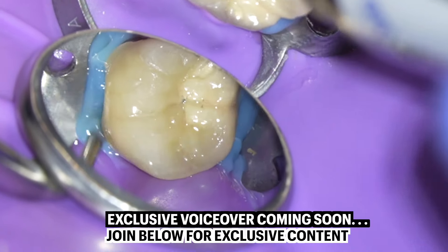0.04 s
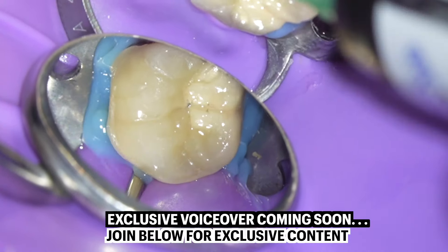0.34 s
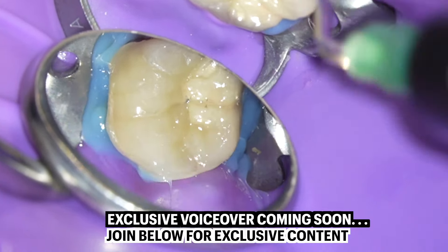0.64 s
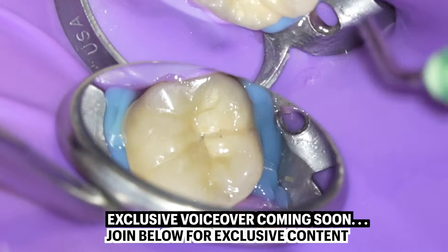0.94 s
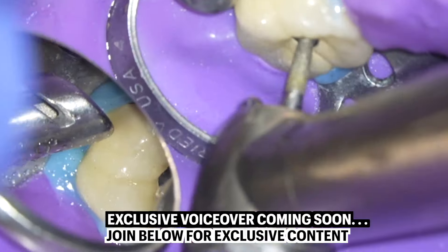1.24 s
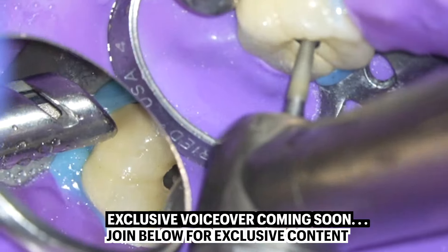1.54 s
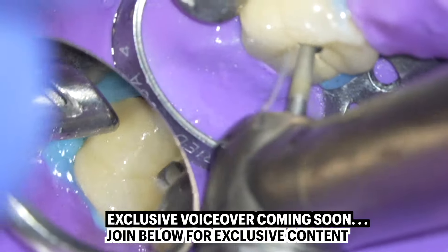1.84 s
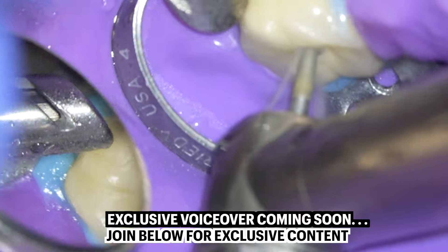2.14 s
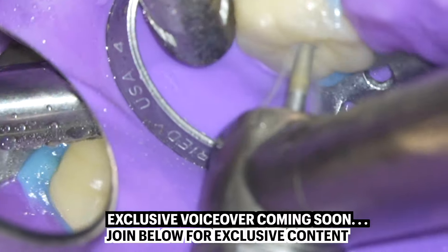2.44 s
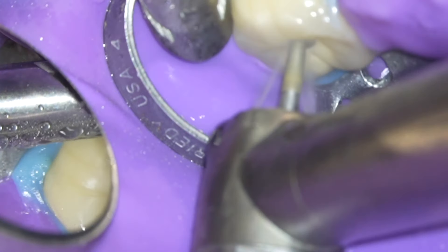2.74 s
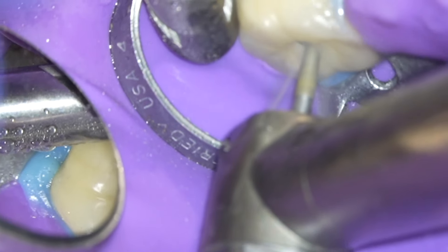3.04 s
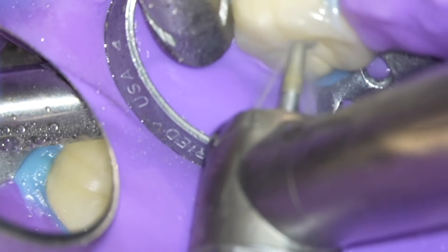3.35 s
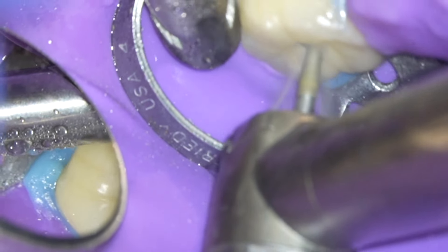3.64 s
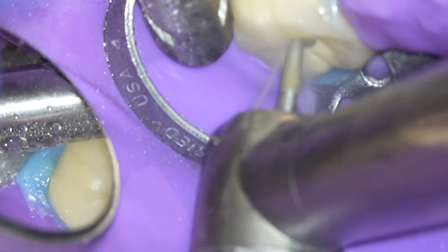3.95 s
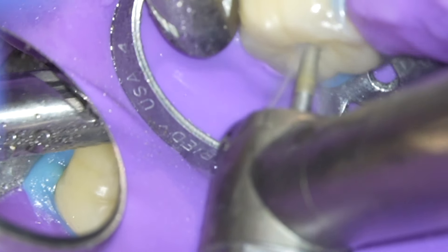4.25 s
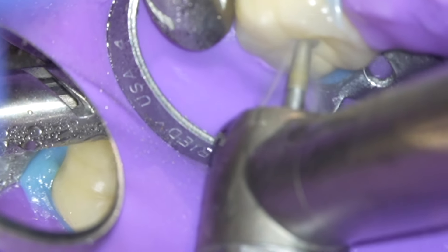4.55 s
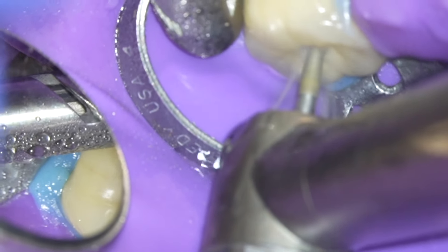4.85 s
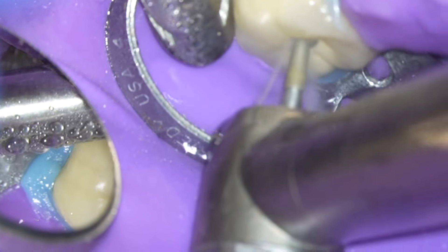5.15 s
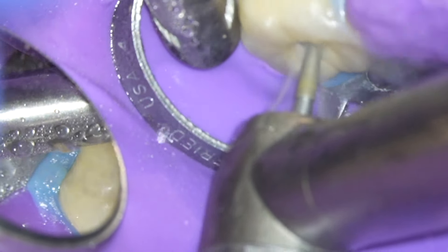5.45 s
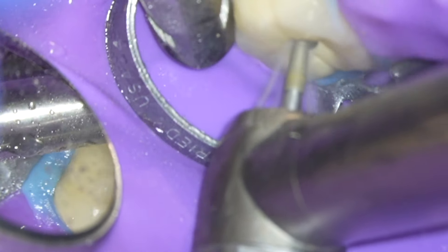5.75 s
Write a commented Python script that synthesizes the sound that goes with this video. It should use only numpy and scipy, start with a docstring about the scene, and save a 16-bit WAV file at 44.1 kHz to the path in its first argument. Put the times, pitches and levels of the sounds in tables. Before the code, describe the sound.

Close to the microphone, a suction tube and a fine water spray suddenly begin hissing over the low hum of a clinic room. A dental drill glides up to a thin, high whine, then dips and recovers repeatedly as it works on a tooth, dropping furthest near the end. Small gurgles pass through the suction while the spray keeps fizzing and grows slightly wetter.

```python
"""Dental clinic room: ventilation and machines hum; then a suction tip and a water spray start at once,
hissing close to the microphone. The air turbine of a handpiece spins up and whines, sagging whenever
the bur presses on the tooth. Hard surfaces nearby colour the spray and make the gliding whine flutter.
Gentle gain control ducks the hiss under a loud whine."""
import sys
import numpy as np
from scipy import signal
from scipy.fft import rfft, irfft
from scipy.io import wavfile

SR = 44100
rng = np.random.default_rng(int(sys.argv[2]) if len(sys.argv) > 2 else 0)


def transcribe(signal):
    """Save signal, clipped to [-1, 1], as a 16-bit WAV file at the path in sys.argv[1]."""
    frames = np.atleast_2d(signal).T
    limited = np.clip(frames, -1, 1)
    pcm = np.round(limited * 32767).astype(np.int16)
    wavfile.write(sys.argv[1], SR, pcm)


N = 256220
TIME, FREQ = np.arange(N) / SR, np.fft.rfftfreq(N, 1 / SR)


def gain_of(db):
    """Decibels to amplitude."""
    return 10 ** (np.asarray(db) / 20)


def unit_rms(x):
    """Scale to rms 1."""
    return x / np.sqrt(np.mean(x ** 2) + 1e-20)


def spectrum(points, hz=FREQ):
    """Interpolate points on a log-frequency axis."""
    point_hz, value = np.transpose(points)
    return np.interp(np.log(hz + 1), np.log(point_hz + 1), value)


def follow(rows):
    """Interpolate each column of a time table at every sample."""
    time_s, *columns = np.transpose(rows)
    return [np.interp(TIME, time_s, column) for column in columns]


def wander(cutoff_hz):
    """Low-passed noise, rms 1."""
    return unit_rms(irfft(rfft(rng.standard_normal(N)) / (1 + (FREQ / cutoff_hz) ** 4), N))


def bell(hz, width_hz):
    """Resonance curve, peak 1."""
    return 1 / (1 + (2 * (FREQ - hz) / width_hz) ** 2)


def bump(centre_s, half_s):
    """Gaussian pulse, peak 1."""
    return np.exp(-((TIME - centre_s) / half_s) ** 2)


def ease(u):
    """Cosine step from 0 to 1."""
    return .5 - .5 * np.cos(np.pi * np.clip(u, 0, 1))


def turbulence():
    """Two independent white noises."""
    return rng.standard_normal((2, N))


def at_ports(drive, colour, band_hz=(0, SR)):
    """Two independent noises blend into one source at two microphone ports; mid rms 1 within band_hz."""
    # likeness of the ports (frequency [Hz], coherence [0-1])
    likeness = [(100, 1), (400, 0.85), (800, 0.63), (3200, 0.94), (4000, 0.33), (5000, 0.63), (6500, 1),
                (7800, 0.38), (9500, 0.79), (11000, 0.23), (12800, 1), (15500, 0.88)]
    # port balance (frequency [Hz], left minus right [dB])
    balance = [(100, 2.5), (450, -2.5), (1000, 0), (2200, -2.5), (3200, 3.5), (4200, -1), (5800, -3),
               (7700, 2.5), (10300, 2), (11500, 0), (12500, -3), (15500, 3)]
    # port phase (frequency [Hz], left lead [rad])
    lead = [(200, 0.2), (2000, 0.49), (3000, 1.02), (3900, -0.7), (5000, -0.57), (6500, 1.27), (7500, 0.73),
            (9000, 0.69), (10200, -0.35), (10900, -0.4), (12000, -0.21), (15000, -0.1)]
    left, other = rfft(drive)
    apart = FREQ ** 2 / (FREQ ** 2 + 200 ** 2)  # long waves reach both ports alike
    coherence = np.clip(1 - apart * (1 - spectrum(likeness)), 0, 1)
    right = (coherence * left + np.sqrt(1 - coherence ** 2) * other) * np.exp(-1j * apart * spectrum(lead))
    lean = gain_of(apart * spectrum(balance) / 2)
    ports = np.array([left * lean, right / lean]) * colour
    in_band = (FREQ > band_hz[0]) & (FREQ < band_hz[1])
    return irfft(ports, N) / np.std(irfft(ports.mean(0) * in_band, N))


def reflections(x, t60_s):
    """Sparse echoes off nearby hard surfaces, different at each port."""
    delay_s = TIME[:SR // 3]
    shape = (2, len(delay_s))
    taps = rng.choice([-1., 1.], shape) * (rng.random(shape) < 2000 / SR) * (delay_s > .002)
    taps *= gain_of(-60 * delay_s / t60_s)
    taps /= np.linalg.norm(taps, axis=1, keepdims=True)
    return signal.fftconvolve(x, taps, axes=1)[:, :N]


def room(waver_hz=1):
    """Ventilation rumble, wavering machine hum and thin whistles of escaping air."""
    # ventilation noise (frequency [Hz], density [dB])
    vent_colour = [(8, -14), (22, -2.5), (30, -6.5), (42, -12), (56, -6.5), (85, -18), (130, -19),
                   (170, -15.5), (250, -19), (420, -17), (600, -21.5), (1100, -22), (1700, -24.5),
                   (2100, -28), (3300, -32.5), (5000, -40.5), (8300, -40.5), (9200, -47.5), (11800, -47),
                   (14000, -68)]
    # ventilation, sinking once the drill runs (time [s], level [dB])
    vent_level = [(0, -71), (1.93, -69.5), (2.05, -72), (2.4, -72.5), (2.6, -76.5), (4.4, -76),
                  (4.85, -73.5), (5.8, -76.5)]
    # machine tones (frequency [Hz], opening level [dB])
    hum_tones = [(24, -70.5), (117.5, -73.5), (419, -83.5), (705, -85.5), (1012, -89.5), (1120, -90)]
    # air leaks (frequency [Hz], width [Hz], level [dB])
    leaks = [(5560, 88, -94), (6460, 150, -91.5), (8680, 130, -93.5)]
    vent_db, = follow(vent_level)
    vent = gain_of(vent_db) * at_ports(turbulence(), gain_of(spectrum(vent_colour)), band_hz=(20, 350))
    hum = whistles = 0
    for hz, db in hum_tones:
        amplitude = np.sqrt(2) * gain_of(db + .5 * wander(9.1))
        hum += amplitude * np.sin(2 * np.pi * np.cumsum(hz + waver_hz * wander(8.2)) / SR)
    hum *= gain_of(vent_db - vent_db[:SR].mean())  # sinks with the rumble
    for hz, width_hz, db in leaks:
        whistles += gain_of(db + wander(4.3)) * at_ports(turbulence(), bell(hz, width_hz))
    return vent + hum + whistles


def tube_db():
    """Colour the suction tube gives to whatever rushes into it."""
    # pipe resonances and notches (frequency [Hz], width [Hz], lift [dB])
    modes = [(728, 81, 6), (1096, 46, -20), (1433, 110, 2.5), (1494, 38, -7.5), (1598, 42, -8),
             (1730, 120, 2.5), (1756, 29, -12), (1970, 39, 4.5), (2052, 31, 10), (2630, 45, 5.5),
             (2770, 70, 1.5), (2810, 34, 5), (2930, 39, -11), (2980, 68, 12), (3555, 110, 5),
             (3780, 70, 5.5), (3800, 220, -2.5), (4250, 100, 10)]
    return sum(db * bell(hz, width_hz) for hz, width_hz, db in modes)


def suction(rush_trim_db=.03, ring_trim_db=-1.5, gurgle_db=.5):
    """Air rushes through the faintly hooting tube; water passing the hollow tip makes it gulp."""
    # steady draw (time [s], air rush [dB], tip ring [dB])
    draw = [(1.2, -59.5, -59.5), (1.9, -58.5, -57.5), (2.5, -61, -61.5), (3.8, -60.5, -60), (4.7, -60, -66),
            (5.8, -59, -63.5)]
    # gulps of air (time [s], half length [s], rush lift [dB], ring lift [dB])
    gulps = [(1.44, 0.069, 2.5, 4.5), (1.84, .04, 3.5, 2.5), (2.413, .04, 1.5, 5), (3.034, .05, 0.5, 6.5),
             (3.48, 0.069, 3.5, 6), (3.622, .05, 3.5, 6), (3.965, 0.054, 0, 6.5), (4.089, 0.07, 4.5, 5),
             (5.23, 0.066, 4, 1.5), (5.69, .04, 2.5, 1)]
    # air rush in the tip (frequency [Hz], density [dB])
    rush_colour = [(200, -20), (420, -17.5), (600, -24.5), (750, -14.5), (1000, -12), (1400, -5),
                   (1800, -1.5), (2300, -0.5), (2800, -3.5), (3600, -1.5), (4200, -5.5), (6000, -15.5),
                   (12000, -16)]
    rush_db, ring_db = follow(draw)
    for time_s, half_s, rush_lift_db, ring_lift_db in gulps:
        gulp = bump(time_s, half_s)
        rush_db += rush_lift_db * gulp
        ring_db += ring_lift_db * gulp
    hoot_db = np.interp(TIME, [1.9, 2.4, 5.0, 5.8], [-90, -77.5, -80.5, -71])
    rush = at_ports(turbulence(), gain_of(spectrum(rush_colour) + tube_db()), band_hz=(1200, 2700))
    rush *= gain_of(rush_db + rush_trim_db)
    ring = gain_of(ring_db + ring_trim_db) * at_ports(turbulence(), bell(hz=3166, width_hz=175))
    hoot = gain_of(hoot_db) * at_ports(turbulence(), bell(hz=1069, width_hz=26))
    return (rush + ring + hoot) * gain_of(gurgle_db * wander(30))


def droplets(per_s, spread_db):
    """Tiny impacts of uneven size at random moments."""
    size = gain_of(spread_db * np.minimum(rng.exponential(1, N), 4))
    return unit_rms(turbulence() * size * (rng.random(N) < per_s / SR))


def spray(jet_trim_db=-1, sputter_db=.72, drops_db=-5, echo_db=-14):
    """The nozzle hisses, mist lands in fizzing droplets, gathered water washes into the suction tip."""
    # spray (time [s], level [dB], mist brightness [dB])
    flow = [(1.24, -57.5, -2), (1.52, -56.5, -1), (1.65, -54, -3), (1.79, -56, -1), (2.05, -55, -4),
            (2.28, -56, -5), (2.38, -54, -2), (2.55, -55.5, 0), (2.85, -55.5, -4), (3.1, -55, -1.7),
            (3.75, -54, -3.5), (4.5, -56, -4.5), (4.9, -56, -3.5), (5.35, -54, -1.5), (5.8, -53.5, -3.2)]
    # water gathering on the tooth (time [s], wash level [dB])
    wetness = [(1.2, -85), (4.0, -72.5), (4.9, -67), (5.25, -64), (5.8, -63.5)]
    # nozzle hiss (frequency [Hz], density [dB])
    jet_colour = [(1000, -20), (3000, -4.5), (4000, -2), (5000, 4.5), (5350, 0.5), (5750, 4), (6800, 3),
                  (7700, -1.5), (8300, 2), (8900, -1), (9800, 0), (11000, -3.5), (13000, -22),
                  (16000, -11.5)]
    # landing mist (frequency [Hz], density [dB])
    mist_colour = [(5000, -20), (9000, -1.5), (10500, -5), (11800, 3), (13100, 0), (13900, -6),
                   (14500, 0.5), (15000, 0.5), (15700, -9)]
    # water washing over the tooth (frequency [Hz], density [dB])
    wash_colour = [(500, -40), (750, -12.5), (1050, 4.5), (1500, -10), (2500, -21.5), (4200, -7),
                   (6000, -7.5), (9000, -13)]
    level_db, bright_db = follow(flow)
    wash_db, = follow(wetness)
    impacts = unit_rms(turbulence() + gain_of(drops_db) * droplets(per_s=3000, spread_db=1.5))
    jet = at_ports(turbulence(), gain_of(spectrum(jet_colour)), band_hz=(6000, 9500))
    mist = at_ports(impacts, gain_of(spectrum(mist_colour)), band_hz=(11500, 15500))
    wash = at_ports(turbulence(), gain_of(spectrum(wash_colour) + tube_db()))
    hiss = gain_of(level_db) * (gain_of(jet_trim_db) * jet + gain_of(bright_db) * mist)
    water = (hiss + gain_of(wash_db) * wash) * gain_of(sputter_db * wander(56))
    return water + gain_of(echo_db) * reflections(water, t60_s=.056)


def rotor(start_s=1.388, spin_up_s=.501, free_hz=5537, bite_delay_s=.081):
    """Shaft speed and octave gain: an S-curve spin-up, then each press drags and flares the octave."""
    # bur on the tooth (start [s], bear down [s], hold [s], release [s], sag [Hz], octave flare [dB])
    presses = [(2.214, .23, .35, .21, 422, -61), (3.12, .2, 0, .4, 479, -60),
               (3.68, 0.34, .06, .18, 365, -60), (4.16, 0.29, .14, .27, 478, -62),
               (4.675, .285, 1, .3, 815, -67), (4.92, 0.16, 1, .3, 706, -76),
               (5.215, .075, 1, .3, 108, -74), (5.355, .1, 1, .3, 155.2, -71),
               (5.52, 0.12, 0, .31, 335, -65)]
    running_s = np.maximum(TIME - start_s, 0)
    speed_hz = free_hz * (1 - np.exp(-(running_s / spin_up_s) ** 2.263))
    octave_gain = gain_of(-74)  # idling
    for touch_s, bear_s, hold_s, release_s, sag_hz, flare_db in presses:
        since_s = TIME - touch_s
        pressure = ease(since_s / bear_s) * (1 - ease((since_s - bear_s - hold_s) / release_s))
        speed_hz -= sag_hz * pressure
        octave_gain += gain_of(flare_db) * bump(touch_s + bite_delay_s, half_s=.095)
    return speed_hz, octave_gain


def run_up(angle_rad, speed_hz):
    """Blade and bearing overtones zip up through the head's resonances as the rotor gathers speed."""
    # overtones (order [x shaft rate], level [dB])
    overtones = [(3, -61), (4, -66), (5, -53.5), (8, -53)]
    # radiation from the handpiece head (frequency [Hz], gain [dB])
    head = [(3000, -18), (4100, -2), (5000, -3), (6500, 3), (7200, -1), (7900, -14), (10000, -14),
            (11200, 1), (13000, -1), (15500, -3)]
    zips = np.zeros((2, N))
    for order, db in overtones:
        hz = order * speed_hz
        amplitude = gain_of(db + spectrum(head, hz) + 1.5 * wander(90))
        zips += amplitude * (hz < SR / 2) * np.sin(order * angle_rad)
    zips *= np.clip((speed_hz - 200) / 400, 0, 1)  # silent at low speed
    return zips + gain_of(-4) * reflections(zips, t60_s=.06)


def turbine(jitter_hz=8, flutter_db=1.27, sway_db=2.5, lead_rad=.26, whine_trim_db=-.73):
    """The unbalanced rotor sings once a turn, with an octave as the bur bites and brief glints."""
    # resonances of handpiece and surroundings (speed [Hz], level [dB], left minus right [dB])
    radiation = [(2600, -65, 2), (3520, -58, 6.5), (3850, -50, 6), (3880, -59, -1), (4055, -47, 6),
                 (4220, -46.5, -6), (4740, -46, -1), (4800, -52, 6), (5070, -45.5, -7), (5077, -44, 1),
                 (5170, -50, -5), (5236, -47.5, 2), (5364, -50.5, -11), (5550, -53, -2)]
    # slow swells and fades of the whine (time [s], gain [dB])
    swells = [(2.08, 3), (2.2, 0.5), (2.4, -4), (2.79, 7), (2.93, 0), (3.05, -14), (3.12, -0.5), (3.2, -4),
              (3.33, 1.5), (3.56, -3), (3.92, 3), (4.17, -5), (4.43, 2), (4.8, -7.5), (5.05, -0.5),
              (5.8, 0.5)]
    # third-harmonic glints (time [s], half length [s], level [dB])
    glints = [(2.189, .06, -62), (3.24, .025, -62), (4.86, .064, -65)]
    speed_hz, octave_gain = rotor()
    swell_db, = follow(swells)
    speeds_hz, levels_db, balances_db = np.transpose(radiation)
    level_db = np.interp(speed_hz, speeds_hz, levels_db) + swell_db + whine_trim_db
    balance_db = np.interp(speed_hz, speeds_hz, balances_db) + sway_db * wander(12)
    sides = np.array([[.5], [-.5]])
    angle_rad = 2 * np.pi * np.cumsum(speed_hz + jitter_hz * wander(36.6)) / SR + sides * lead_rad
    tone = np.sin(angle_rad)
    whine = gain_of(level_db + sides * balance_db + flutter_db * wander(32)) * tone
    octave = octave_gain * gain_of(-2 + 1.9 * wander(30)) * np.sin(2 * angle_rad)
    glint_gain = sum(gain_of(db) * bump(time_s, half_s) for time_s, half_s, db in glints)
    overtones = octave + glint_gain * np.sin(3 * angle_rad)
    # scatter in the spray and late, off-pitch echoes fade less than the whine: most beating when it is weak
    indirect_db = swell_db / 2
    scatter = gain_of(indirect_db - 64.5) * (wander(45) * tone + wander(45) * np.cos(angle_rad))
    echo_feed = gain_of(indirect_db - 62) * tone + gain_of(-10) * overtones
    at_speed = np.clip((speed_hz - 2600) / 700, 0, 1)  # crossfade from run-up to whine
    echoes = reflections(at_speed * echo_feed, t60_s=.3)
    zips = (1 - at_speed) * run_up(angle_rad, speed_hz)
    return np.sqrt(2) * (at_speed * (whine + overtones + scatter) + echoes + zips)


def scene(onset_s=1.212, rise_s=.0018):
    """The room alone, then suction, spray and turbine."""
    started = np.clip((TIME - onset_s) / rise_s, 0, 1)
    return room() + started * (suction() + spray() + turbine())


def record(dry, threshold_db=-50.5, ratio=1.606, response_hz=14, cutoff_hz=15760):
    """Gentle gain control, then a steep low-pass."""
    pole = np.exp(-2 * np.pi * response_hz / SR)
    power_db = 10 * np.log10(signal.lfilter([1 - pole], [1, -pole], (dry ** 2).mean(0)) + 1e-12)
    duck_db = np.maximum(power_db - threshold_db, 0) * (1 - 1 / ratio)
    lowpass = signal.firwin(1023, cutoff_hz, window=("kaiser", 8), fs=SR)
    return signal.oaconvolve(dry / gain_of(duck_db), lowpass[None], "same", axes=1)


dry = scene()
out = record(dry)
transcribe(out)
```